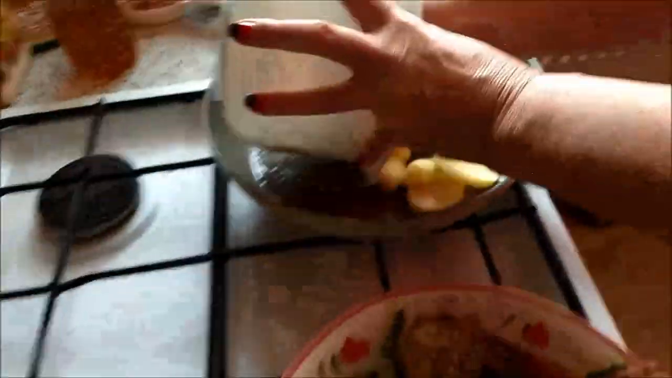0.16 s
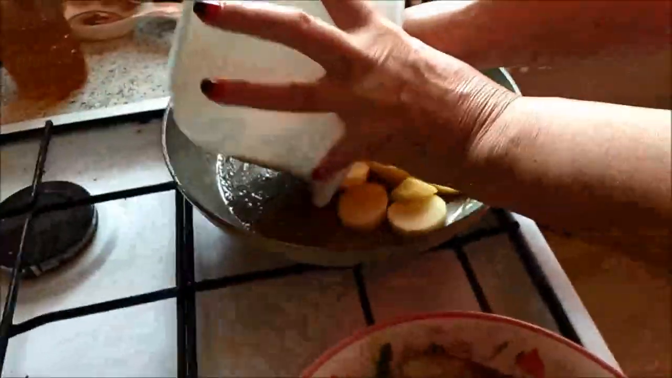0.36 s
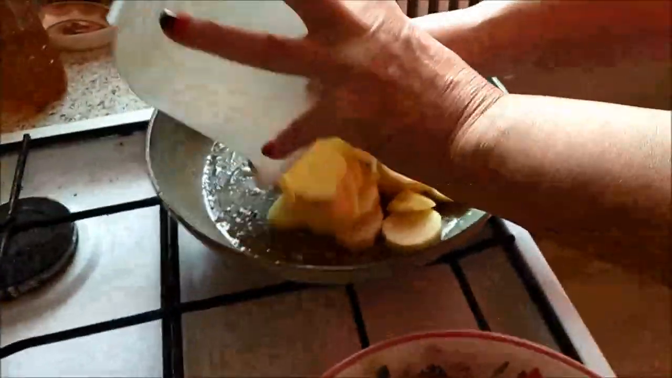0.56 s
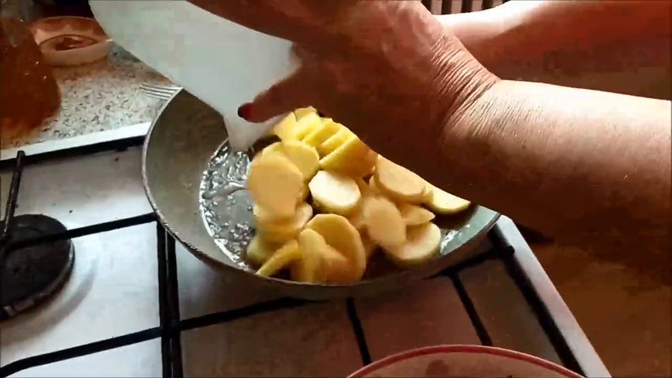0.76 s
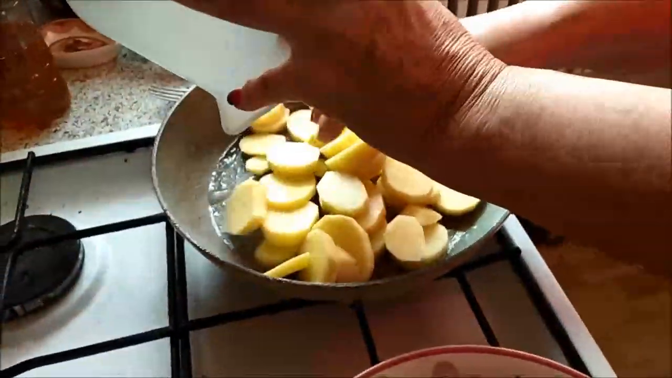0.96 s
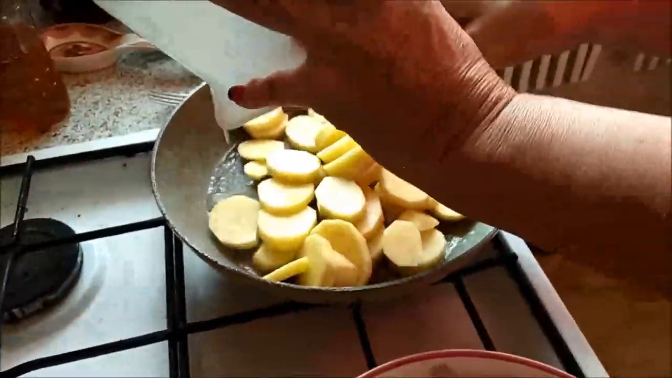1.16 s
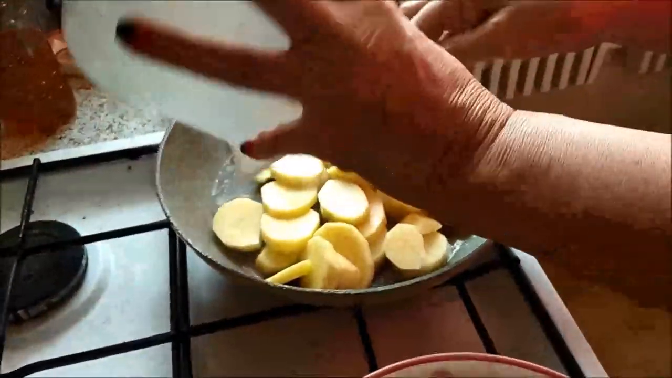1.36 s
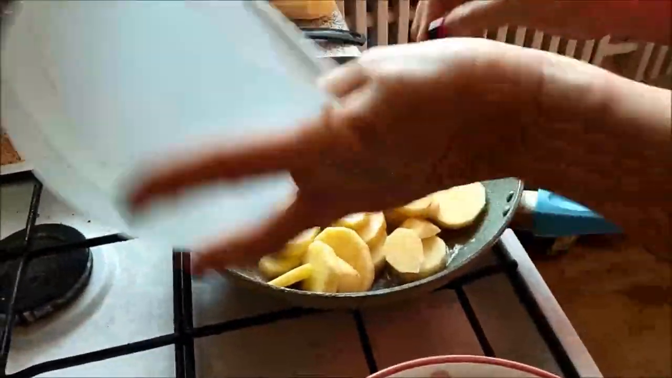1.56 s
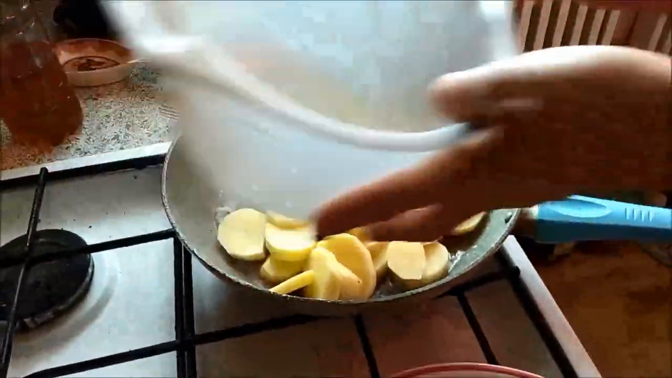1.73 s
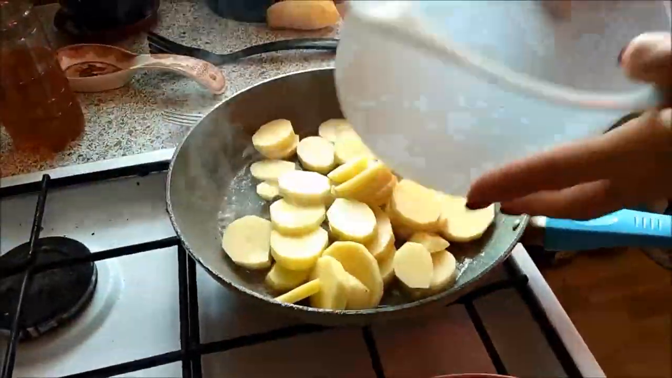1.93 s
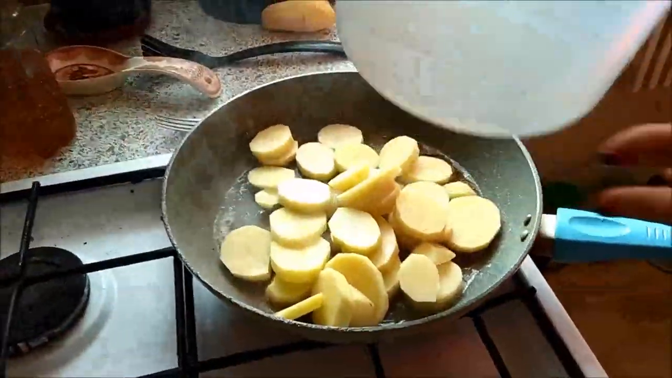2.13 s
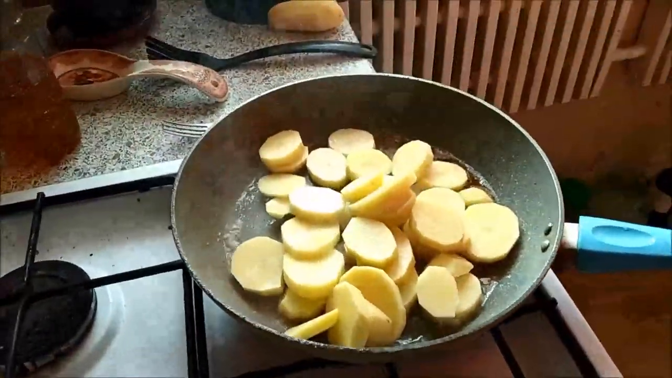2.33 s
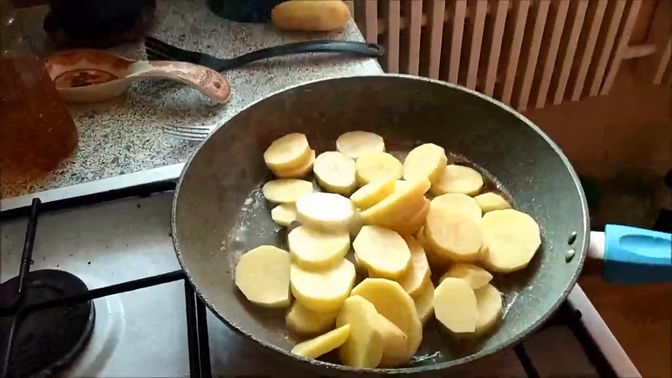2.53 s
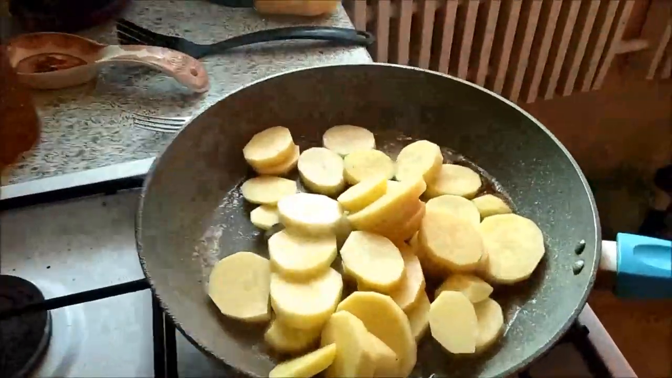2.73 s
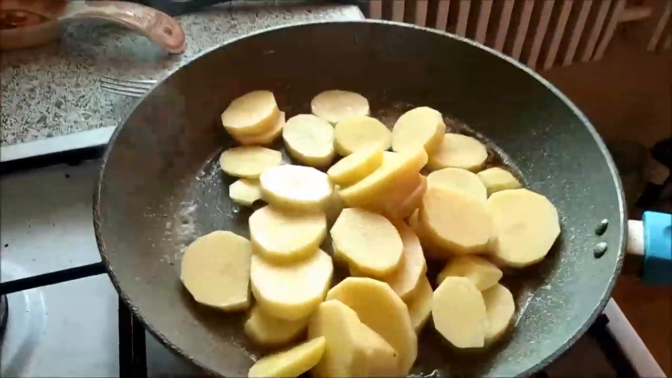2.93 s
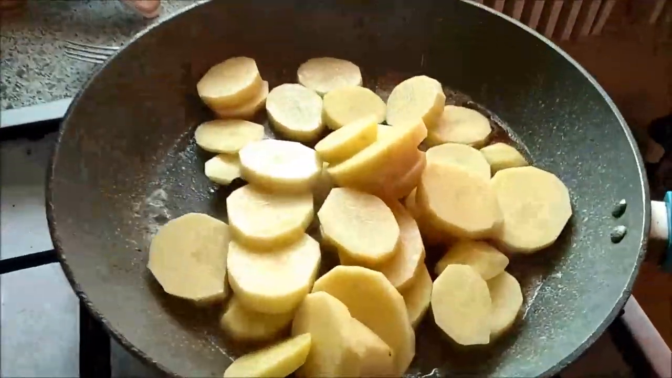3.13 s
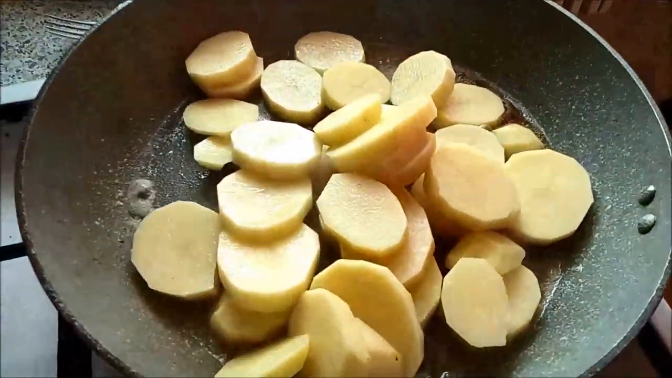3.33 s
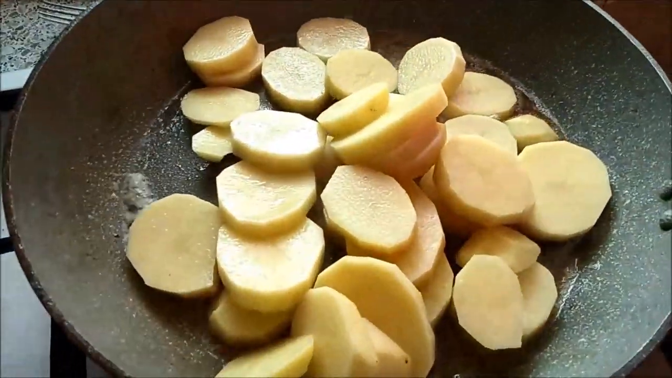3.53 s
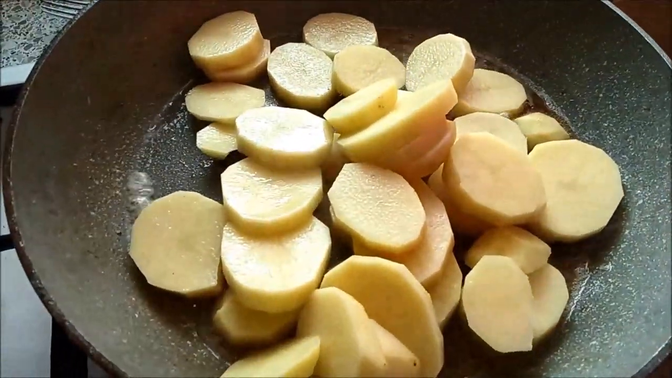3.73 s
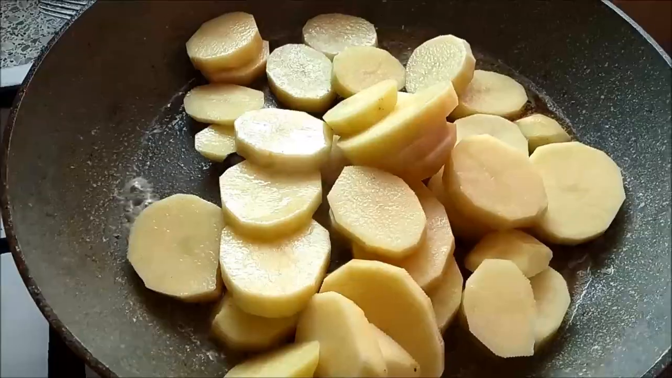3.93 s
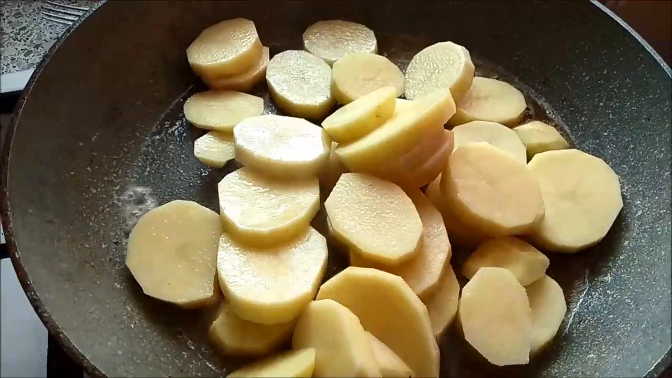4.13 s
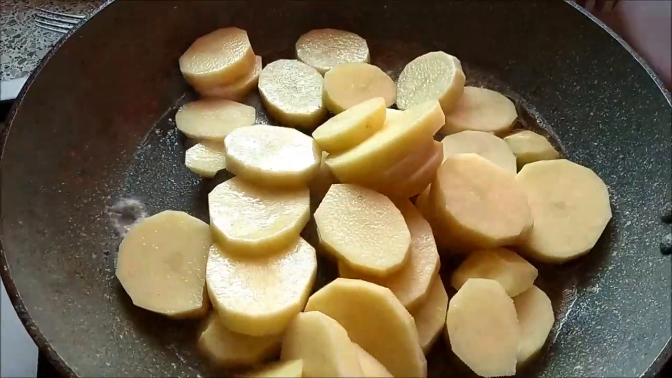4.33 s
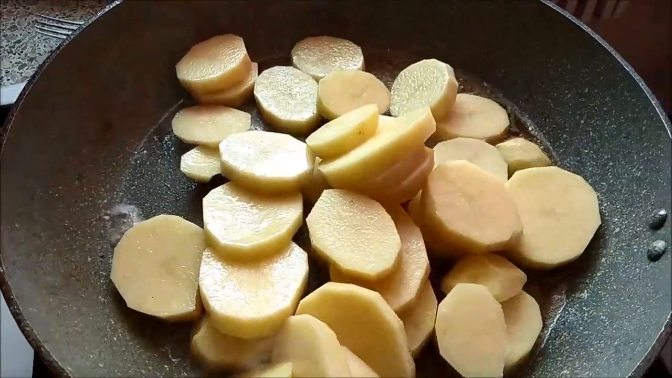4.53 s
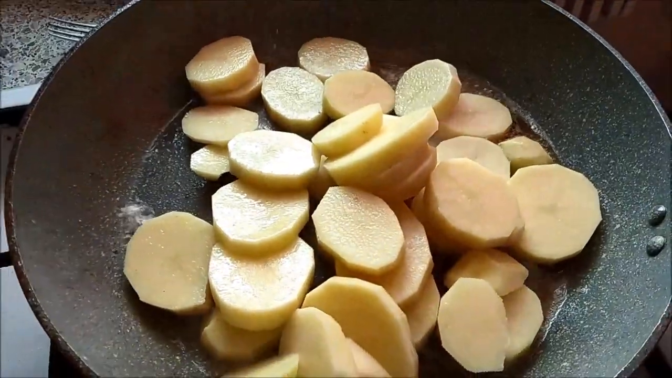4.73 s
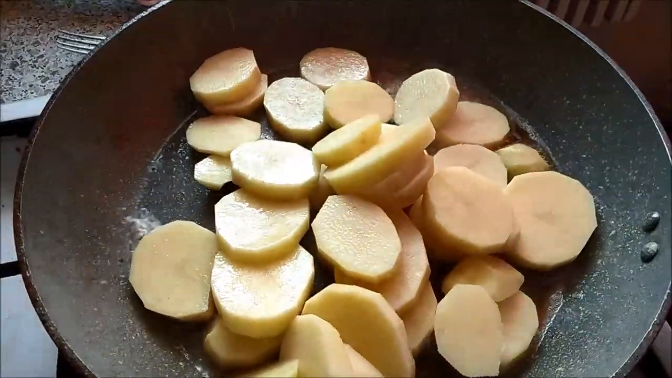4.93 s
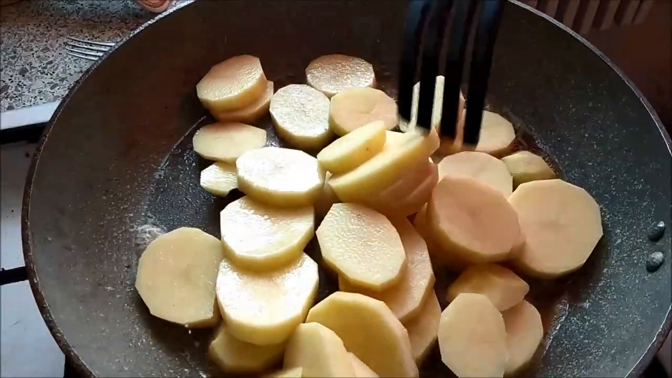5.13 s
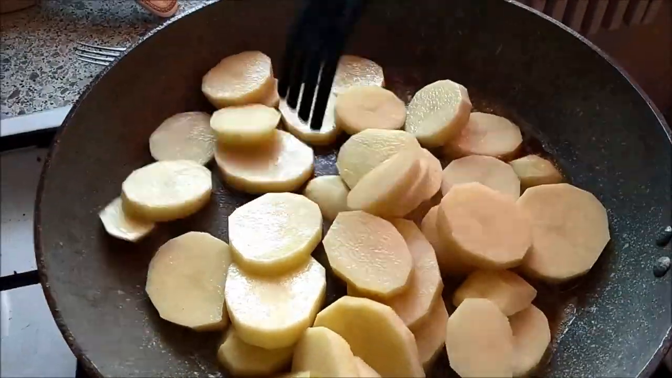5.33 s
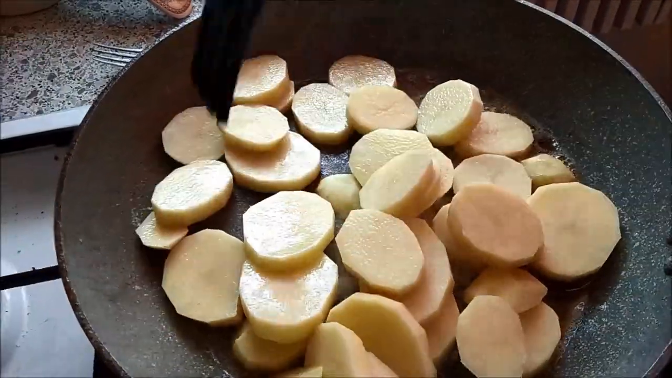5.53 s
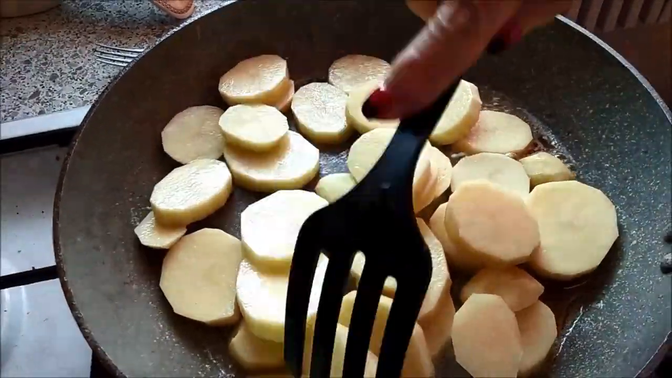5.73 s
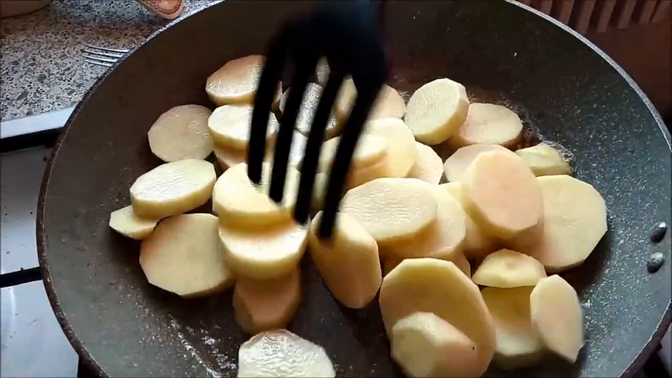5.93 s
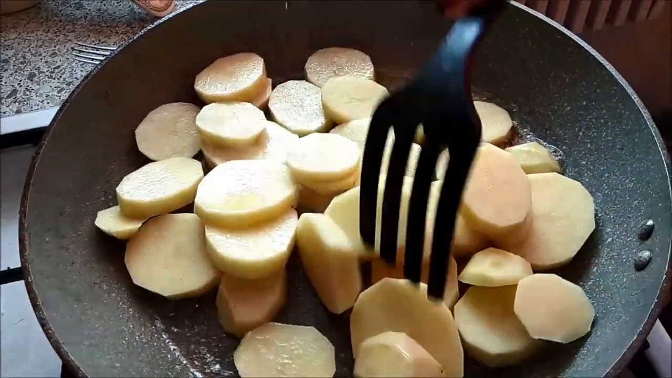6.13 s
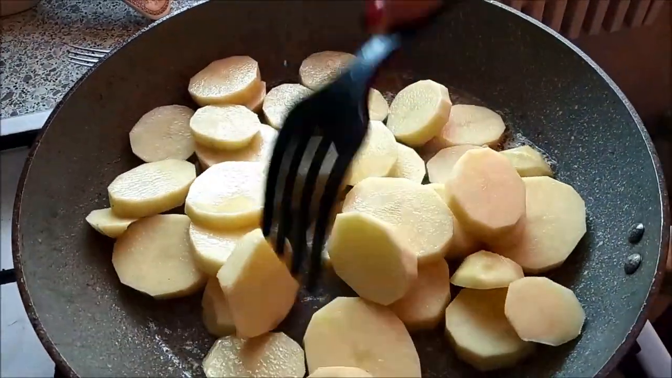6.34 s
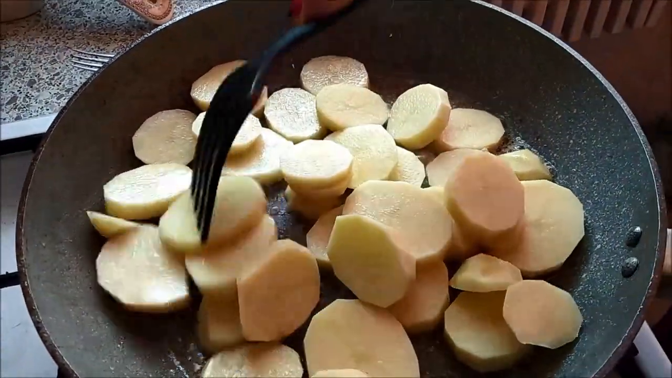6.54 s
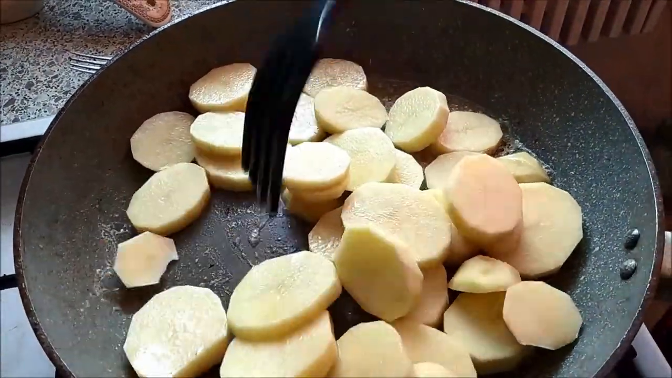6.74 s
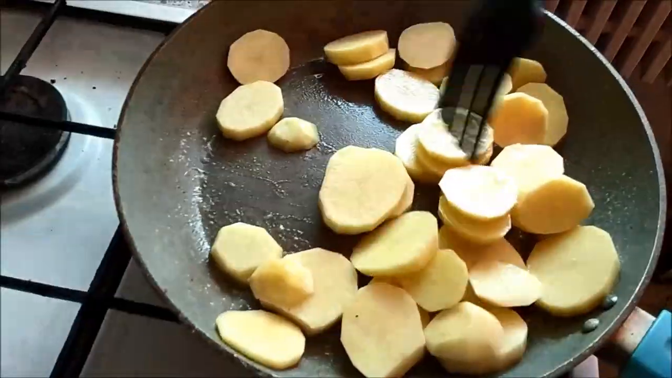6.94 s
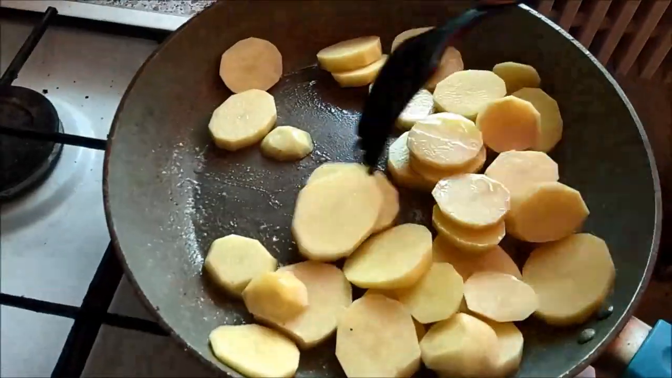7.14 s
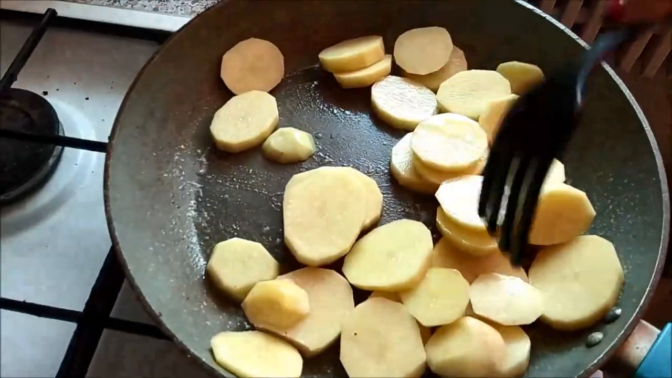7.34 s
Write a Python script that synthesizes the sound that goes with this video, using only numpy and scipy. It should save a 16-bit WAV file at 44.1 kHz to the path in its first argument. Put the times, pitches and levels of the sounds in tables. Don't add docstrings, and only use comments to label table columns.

```python
import sys
import numpy as np
from scipy import signal
from scipy.fft import rfft, irfft, next_fast_len
from scipy.io import wavfile
from scipy.ndimage import uniform_filter1d

SR = 44100
rng = np.random.default_rng(int(sys.argv[2]) if len(sys.argv) > 2 else 0)


def store_wav(level_fs):
    pcm = np.round(np.clip(np.atleast_2d(level_fs), -1, 1) * 32767)
    wavfile.write(sys.argv[1], SR, pcm.T.astype(np.int16))


def decibels_to_gain(level_db):
    exponent = np.asarray(level_db, float) / 20
    return 10 ** exponent


N = 330220
OPPOSITE = np.array([[1], [-1]])


def rms_one(x):
    return x / np.sqrt(np.mean(x ** 2) + 1e-20)


def in_time(rows):
    s, *columns = np.transpose(rows)
    return [np.interp(np.arange(N) / SR, s, column) for column in columns]


def at_hz(points, hz):
    curve_hz, value = np.array(points).T
    return np.interp(np.log(hz), np.log(curve_hz), value)


def drift(rate_hz):
    r = np.exp(-80 * np.pi * rate_hz / SR)
    noise = rng.standard_normal(N // 40 + 2002)
    slow = signal.lfilter([1], [1, -2 * r, r * r], noise)[2000:]
    return np.interp(np.arange(N) / 40, np.arange(len(slow)), rms_one(slow))


def coloured(x, spectrum):
    size = next_fast_len(N)
    hz = np.arange(size // 2 + 1) * SR / size + 1
    return rms_one(irfft(rfft(x, size) * decibels_to_gain(at_hz(spectrum, hz)), size)[..., :N])


def bursts(per_s, spread_db, rows):
    size_draw, time_draw, sign_draw = rng.random((3, *rows, N))
    sizes = decibels_to_gain(spread_db * np.minimum(-np.log(size_draw + 1e-9), 4.5))
    return (time_draw < per_s / SR) * sizes * np.sign(sign_draw - .5)


def strikes(rows, gain_db):
    start_s, peak_db, lean_db = np.transpose(rows)
    clicks = np.full((2, N), 1e-18)
    clicks[:, np.round(start_s * SR).astype(int)] = decibels_to_gain(peak_db + gain_db + lean_db * OPPOSITE / 2)
    return clicks


# start_s [s], level_db [dB]
BOIL_VIGOUR = [(0.0, -44.5), (0.07, -38.5), (0.11, -42.5), (0.22, -32.5), (0.385, -28.5), (0.41, -25.5),
               (0.5, -23), (0.67, -24), (0.73, -20.5), (1.2, -18), (1.4, -19), (2.4, -16.5), (3.38, -15.5),
               (5.15, -19), (5.63, -17), (6.85, -19), (6.89, -24), (7.49, -25)]
# start_s [s], spray_over_bubbles_db [dB]
WET_FACES = [
    (0.0, 30.5),
    (2.2, 0.5),
    (5.4, 5),
    (6.9, 1),
]
# start_s [s], bubble_change_db [dB]
STEAM_FLARES = [(0.14, 9), (0.49, -2), (0.56, 0.5), (1.96, 3.5), (2.25, 0.5), (2.49, -1.5), (3.75, 2.5),
                (4.75, 2.0), (6.8, 1.5), (7.12, 3.5), (7.25, 1.5), (7.45, -1.5)]


def boil():
    wetting_s, drying_s, flare_s = 0.038, 2.09, 0.017
    t = np.arange(N) / SR
    vigour_db, = in_time(BOIL_VIGOUR)
    wet_db = -2
    for start_s, db in WET_FACES:
        since = (t - start_s).clip(0)
        wet_db = wet_db + db * (1 - np.exp(-since / wetting_s)) * np.exp(-since / drying_s)
    flare_db = sum(db * np.exp(-((t - start_s) / flare_s) ** 2) for start_s, db in STEAM_FLARES)
    spread = t > 6.88
    spray_db = vigour_db - 1.12 + 0.31 * wet_db
    coarse_db = spray_db - wet_db + flare_db
    rumble_db = coarse_db - 15.5 + 1 * spread
    lead_db = np.minimum(-0.6 + 0.74 * wet_db, 3) + 4.5 * spread
    return spray_db + 0.2 * flare_db, coarse_db, rumble_db, lead_db


# pitch_hz [Hz], density_db [dB per Hz]
SIZZLE_COLOUR = [(24, -47.5), (40, -19), (200, -20), (444, -15.5), (790, -13.5), (1240, -9), (1440, -9),
                 (2050, -3.5), (4500, -5), (7000, -4), (9100, -1.5), (10600, 3), (12600, 4), (14700, -2),
                 (17000, -1.5)]
# pitch_hz [Hz], left_right_likeness [-1 to 1]
SIZZLE_LIKENESS = [(60, 0.21), (150, 0.14), (380, 0.37), (950, 0.34), (2380, -0.04), (5980, 0.02),
                   (15000, -0.0)]
# [dB, left minus right]
SIZZLE_LEAN = [(60, 2), (150, 9.5), (380, 1.5), (950, 3.5), (2380, 4.5), (5980, -1.5), (15000, 2)]


def sizzle():
    spray_db, coarse_db, rumble_db, lead_db = boil()
    size = next_fast_len(N)
    clicks = rfft(coloured(bursts(11000, 3.0, rows=(2,)), SIZZLE_COLOUR), size)
    bin_hz = np.arange(size // 2 + 1) * SR / size + 1
    place = 1.5 * np.log2(bin_hz / 30).clip(0)
    surge_db = .5 * drift(0.94) + 0.39 * drift(11.3)
    out = 0
    for k in range(16):
        share = np.clip(1 - abs(place - k), 0, 1)
        mid, side = irfft(clicks * share, size)[:, :N]
        hz = 30 * 2 ** (k / 1.5)
        alike = np.clip(at_hz(SIZZLE_LIKENESS, hz), -1, 1)
        pair = np.sqrt(1 + alike) * mid + np.sqrt(1 - alike) * side * OPPOSITE
        fine = at_hz([(4000, 0.21), (9000, 0.63)], hz)
        deep = at_hz([(900, 0.85), (1800, 0.25)], hz)
        level_db = fine * spray_db + deep * (rumble_db + 24.0)
        level_db = level_db + (1 - fine - deep) * (coarse_db + 8.0)
        lean_db = at_hz(SIZZLE_LEAN, hz) + (1 - fine) * (lead_db - 2.5)
        own_db = np.array([.5 * drift(1.2), .5 * drift(8.4)])
        out = out + pair * decibels_to_gain(level_db + surge_db + own_db + lean_db * OPPOSITE / 2)
    return decibels_to_gain(2.5) * out


# pitch_hz [Hz], unevenness_db [dB]
BAND_UNEVENNESS = [(600, 3), (1500, 1.5), (3000, 4), (8800, 5), (10500, 2.5), (13000, 2.5), (15000, 7.5)]


def flickering_bands(x, lasts_s, shared):
    hz, _, bins = signal.stft(x, SR, nperseg=1024)
    r = np.exp(-512 / SR / lasts_s)
    draw = rng.standard_normal((3, *bins.shape[1:]))
    field = signal.lfilter([1], [1, -r], draw[:2] + shared * draw[2])
    field = rms_one(uniform_filter1d(field, size=3, axis=1))
    depth_db = at_hz(BAND_UNEVENNESS, hz + 1)[:, None]
    gain = decibels_to_gain(depth_db * np.minimum(field, 1.05))
    gain = gain / np.sqrt(np.mean(gain ** 2, axis=2, keepdims=True))
    return signal.istft(bins * gain, SR, nperseg=1024)[1][:, :N]


def spits():
    spray_db = boil()[0]
    blips = bursts(65, 5.76, rows=(2,)) * decibels_to_gain(spray_db + [[-3], [-9]])
    return signal.sosfilt(signal.butter(2, [60, 1500], "band", fs=SR, output="sos"), blips)


# [dB, left minus right]
BIG_BUBBLES = [(0.4911, -19, 6), (1.1283, -14, 4), (1.96, -13, 2), (2.4723, -11, -3), (4.7348, 1, 7),
               (5.2008, -3, 3), (7.1401, -13, 6), (7.157, -6, 5), (7.2595, -10, 2), (7.2374, -8, 5),
               (7.3082, -6, 7), (7.317, -6, 7), (7.388, -13, 6), (7.482, -18, 8)]


def pops():
    band = signal.butter(2, [900, 9000], "band", fs=SR, output="sos")
    return signal.sosfilt(band, strikes(BIG_BUBBLES, gain_db=9))


# [dB, left minus right]
PAN_BLOWS = [(0.004, -25.5, -4), (0.039, -27, -3), (0.053, -37, -3), (0.12, -30, -1.5), (0.129, -29, 0),
             (0.132, -17, 4), (0.163, -29, 2), (0.173, -24.5, -2.5), (0.194, -26.5, 2), (0.257, -31, -3),
             (0.574, -31, 0), (0.659, -32, 0), (0.689, -35, 0.0), (0.752, -27, 3), (0.969, -31, 6),
             (5.145, -32, 0.5), (5.455, -23, 0.5), (5.567, -38, 0.5), (5.797, -43, 0), (6.219, -26, -3),
             (6.545, -37, 3.5)]
# pitch_hz [Hz], level_db [dB], t60_s [s]
PAN_RING = [(110.6, -7, 0.11), (499, -1.5, 0.091), (584, -1.5, 0.041), (755, -1.5, 0.041), (865, 0.5, 0.05),
            (950, -20, 0.034), (1084, 4, 0.035), (1200, -4, 0.032), (1670, -4, 0.069), (2290, 2, 0.041),
            (2900, -31.5, .02)]
# start_s [s], rattle_db [dB]
TUB_TUMBLE = [
    (0.0, -42.5),
    (0.178, -42),
    (0.4, -58),
    (0.526, -48),
    (0.71, -38),
    (0.838, -39),
    (1.274, -44),
    (1.5, -43),
]


def knocks():
    start_s, peak_db, lean_db = np.transpose(PAN_BLOWS)
    at = np.round(start_s * SR).astype(int)
    luck_db = rng.normal(0, 3, (len(at), len(PAN_RING)))
    falling = decibels_to_gain(in_time(TUB_TUMBLE)[0] - 12.5) * (np.arange(N) < 1.5 * SR)
    out = np.zeros((2, N))
    for k, (hz, level_db, t60_s) in enumerate(PAN_RING):
        rattle_db = level_db + 4.5 - 8 * abs(np.log2(hz / 860))
        rattle = falling * decibels_to_gain(rattle_db) * bursts(400, 2.76, rows=())
        clicks = np.zeros((2, N)) + rattle + 1e-18
        clicks[:, at] = decibels_to_gain(peak_db + level_db - 10 + luck_db[:, k] + lean_db * OPPOSITE / 2)
        r, w = decibels_to_gain(-60 / (t60_s * SR)), 2 * np.pi * hz / SR
        ring = signal.lfilter([0, np.sin(w)], [1, -2 * r * np.cos(w), r * r], clicks)
        out += (-1) ** k * ring
    contact = np.hanning(round(0.0006 * SR))
    return signal.lfilter(contact / contact.sum(), 1, out)


def slaps():
    decay = np.exp(-1 / (0.0071 * SR))
    envelope = signal.lfilter([1], [1, -decay], strikes(PAN_BLOWS, gain_db=-5))
    puffs = envelope * rng.standard_normal(N)
    return signal.sosfilt(signal.butter(1, [450, 3200], "band", fs=SR, output="sos"), puffs)


# pitch_hz [Hz], density_db [dB per Hz]
KITCHEN_HUM = [(25, 5), (60, 4), (88, -3.5), (104, 4), (125, -4), (200, -6), (400, -6.5), (500, -7),
               (850, 2), (1300, -10), (4000, -22)]


def room():
    mid, side = coloured(rng.standard_normal((2, N)), KITCHEN_HUM)
    return decibels_to_gain(-49 + 3.4 * drift(1.1)) * (mid + 0.26 * side * OPPOSITE)


def scene():
    hiss = flickering_bands(sizzle(), lasts_s=0.038, shared=1.65)
    return hiss + spits() + pops() + knocks() + room() + slaps()


# start_s [s], height_db [dB], recovery_s [s]
LEFT_OVERLOADS = [(1.1862, -21, 0.038), (2.2872, -18.5, 0.035), (2.4197, -12, .015), (2.5857, -23, .015),
                  (3.2873, -21, 0.027), (3.3737, -21, 0.018), (4.3546, -17.5, 0.024), (5.573, -27, 0.012),
                  (6.8941, -23.5, 0.031), (7.1402, -16, 0.019), (7.2609, -10, 0.016),
                  (7.3084, -13.5, 0.017)]
# start_s [s], height_db [dB], recovery_s [s]
RIGHT_OVERLOADS = [
    (2.5157, -16, 0.045),
    (4.0074, -28.5, .03),
    (4.3539, -14, 0.032),
    (4.7532, -17.5, 0.054),
    (5.2086, -19, 0.057),
]


def jumps(rows):
    out, t = np.zeros(N), np.arange(N) / SR
    for start_s, height_db, recovery_s in rows:
        span = slice(round(start_s * SR), round((start_s + 6 * recovery_s) * SR))
        since = (t[span] - start_s).clip(0)
        out[span] += decibels_to_gain(height_db) * np.exp(-since / recovery_s)
    return signal.sosfilt(signal.butter(1, 4000, fs=SR, output="sos"), out)


def roll_off(x):
    return signal.sosfilt(signal.butter(12, 15900, fs=SR, output="sos"), x)


def record(dry):
    left = np.roll(dry[0], 4) - jumps(LEFT_OVERLOADS)
    right = dry[1] + jumps(RIGHT_OVERLOADS)
    x = .8 * np.tanh(np.array([left, right]) / .8)
    x = signal.sosfilt(signal.ellip(12, .3, 75, 15760, fs=SR, output="sos"), x)
    return roll_off(x)


dry = scene()
out = record(dry)
store_wav(out)
```